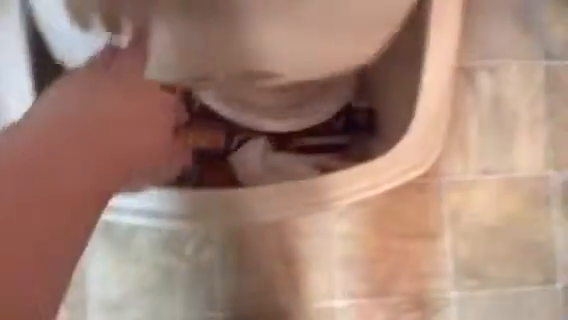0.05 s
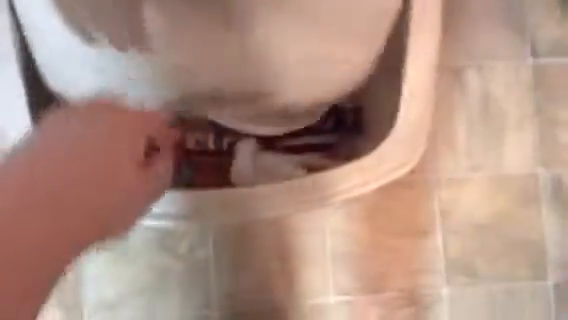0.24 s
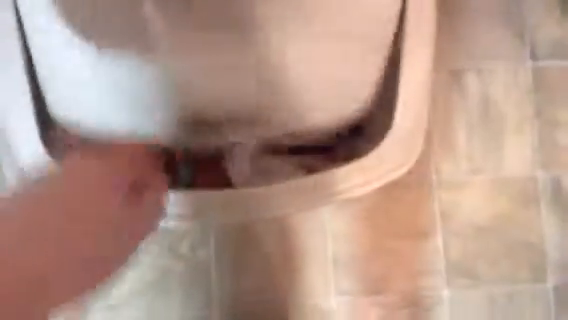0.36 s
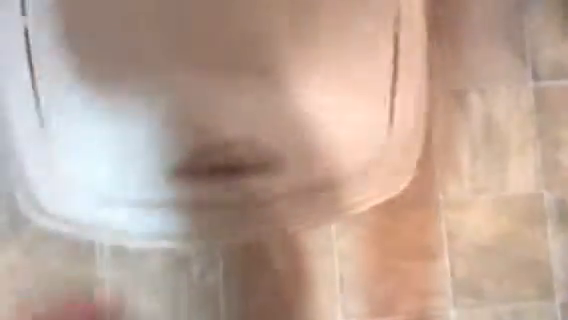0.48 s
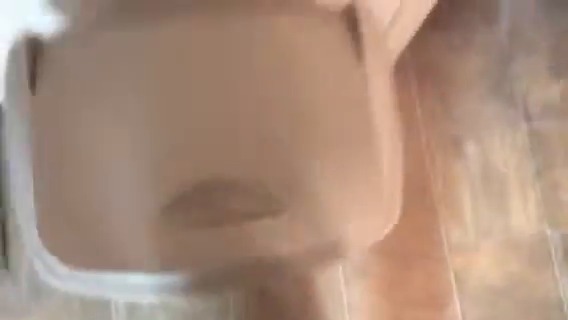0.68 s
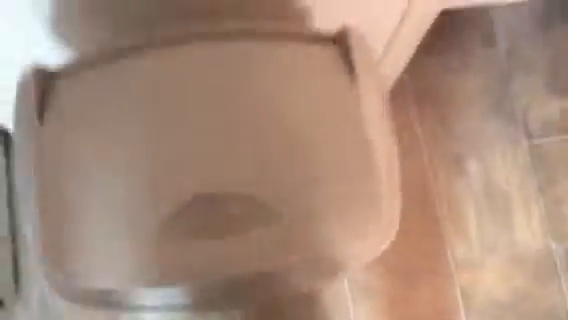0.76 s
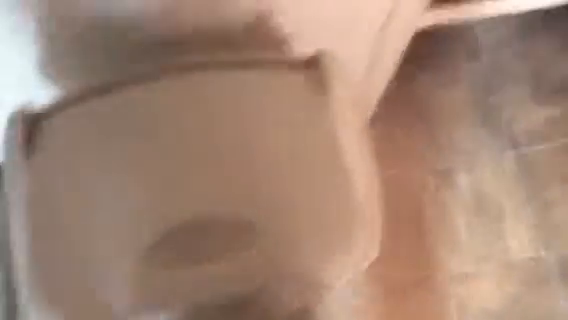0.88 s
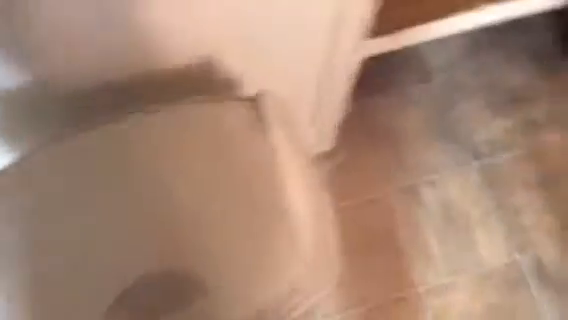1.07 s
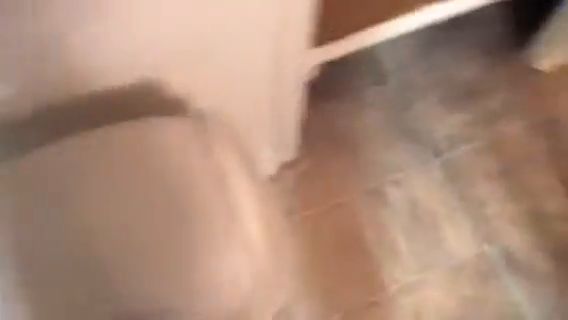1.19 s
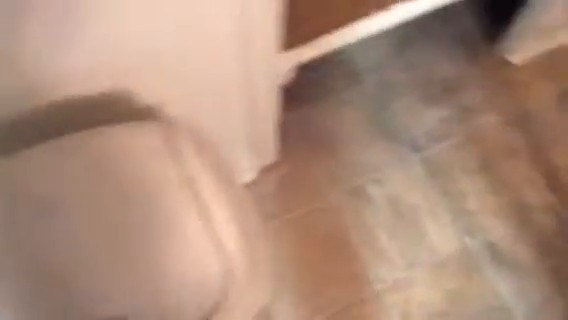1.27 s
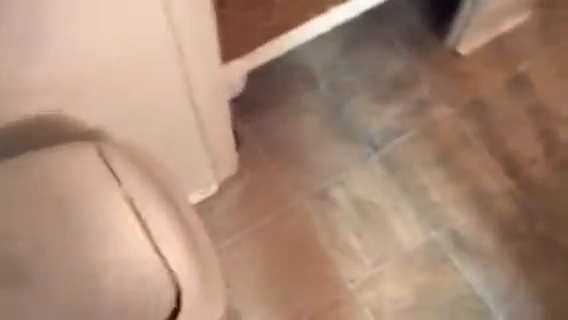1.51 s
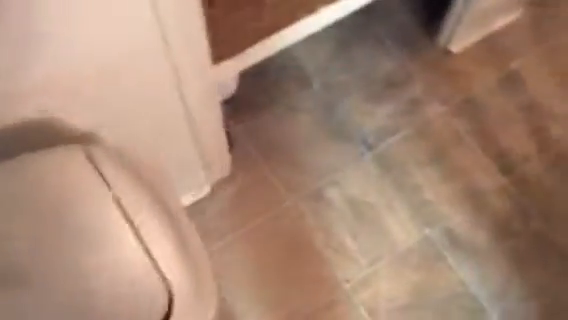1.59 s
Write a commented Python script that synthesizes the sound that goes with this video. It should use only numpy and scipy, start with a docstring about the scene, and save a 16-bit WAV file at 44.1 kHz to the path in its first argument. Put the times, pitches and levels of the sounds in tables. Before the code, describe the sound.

Close up in a small tiled room, rubbish lands in a plastic bin with a sharp, hollow thump. The liner crinkles, the lid swings shut with a quick clatter, and soft bumps and scrapes follow over a faint hum.

```python
"""A small tiled room: a hand lets go of the swing lid of a plastic bin. Rubbish thumps in, the lid
swings back and clatters on its frame, and the liner rustles and crackles. A few soft knocks, scuffs
and swishes follow, probably steps; a mains hum lies underneath. Each blow rings damped modes, with
noise bursts for rattle and crack. Friction is a stream of tiny slips with a faint ringing colour.
Blows and scrapes reflect off the tiles."""
import sys
import numpy as np
from scipy import signal
from scipy.fft import rfft, irfft, next_fast_len
from scipy.io import wavfile

SR = 44100
rng = np.random.default_rng(int(sys.argv[2]) if len(sys.argv) > 2 else 0)


def store_wav(level_fs):
    """Save 16-bit WAV to argv[1]."""
    pcm = np.round(np.clip(np.atleast_2d(level_fs), -1, 1) * 32767)
    wavfile.write(sys.argv[1], SR, pcm.T.astype(np.int16))


N = 72765
T = np.arange(N) / SR


def from_db(db):
    """Decibels to gain."""
    return 10 ** (np.asarray(db) / 20)


def unit_rms(x):
    """Scale to rms 1."""
    return x / np.sqrt(np.mean(x ** 2) + 1e-20)


def envelope(points):
    """Gain over time from (time [s], level [dB]) points."""
    return from_db(np.interp(T, *np.transpose(points)))


def burst(start_s, rise_s, t60_s):
    """Linear attack, exponential release."""
    attack = np.clip((T - start_s) / rise_s, 0, 1)
    return attack * from_db(-60 * np.clip((T - start_s - rise_s) / t60_s, 0, 2))


def click(time_s):
    """Unit impulse."""
    return 1. * (np.arange(N) == int(time_s * SR))


def at_hz(points, hz):
    """Read a table on a log-frequency axis."""
    points_hz, values = np.transpose(points)
    return np.interp(np.log(np.maximum(hz, 1)), np.log(points_hz), values)


def colour(x, spectrum, tilt_db_per_oct=0):
    """Impose a spectrum and a tilt; rms 1."""
    size = next_fast_len(N)
    hz = np.fft.rfftfreq(size, 1 / SR)
    gain_db = at_hz(spectrum, hz) + tilt_db_per_oct * np.log2(np.maximum(hz, spectrum[0][0]))
    return unit_rms(irfft(rfft(x, size) * from_db(gain_db), size)[:N])


def noise(spectrum):
    """Coloured noise; rms 1."""
    return colour(rng.standard_normal(N), spectrum)


def ring(x, hz, t60_s):
    """One mode: a unit click starts a decaying sine of height 1."""
    radius = from_db(-60 / (t60_s * SR))
    angle = 2 * np.pi * hz / SR
    return signal.lfilter([0, np.sin(angle)], [1, -2 * radius * np.cos(angle), radius ** 2], x + 1e-18)


def resonate(x, modes):
    """Drive modes of alternating polarity; rms 1."""
    ringing = sum(from_db(db) * ring(x, hz, t60_s) * (-1) ** k for k, (hz, t60_s, db) in enumerate(modes))
    return unit_rms(ringing)


def friction(slips_per_s=4800, spread_db=3, slip_share=0.87):
    """Tiny slips of uneven size over smooth noise."""
    slips = (rng.random(N) < slips_per_s / SR) * rng.choice([-1, 1], N)
    sizes = from_db(spread_db * np.minimum(rng.exponential(1, N), 4))
    smooth = rng.standard_normal(N)
    return np.sqrt(slip_share) * unit_rms(slips * sizes) + np.sqrt(1 - slip_share) * smooth


def ripple(x, depth_db=4, spacing_hz=170.5):
    """A fine random spectral ripple that gives a faint ringing colour; rms 1."""
    size = next_fast_len(N)
    grid_hz = np.arange(400) * spacing_hz
    heights = np.clip(rng.standard_normal(len(grid_hz)), -2, 2)
    gain_db = depth_db * np.interp(np.fft.rfftfreq(size, 1 / SR), grid_hz, heights)
    return unit_rms(irfft(rfft(x, size) * from_db(gain_db), size)[:N])


# mains partials: (frequency [Hz], rms level [dB])
HUM_PARTIALS = [(59.2, -56), (118.4, -60), (177.6, -66), (236.9, -64.5), (296.1, -80.5), (360.7, -75.5)]
# room tone: (frequency [Hz], relative density [dB])
ROOM_TONE_SPECTRUM = [(25, 9), (55, -8), (90, -13), (150, 3.5), (230, -2), (300, -8), (480, -10),
                      (700, -21.5), (1200, -29), (2500, -34), (6000, -40.5), (15000, -36)]
# hiss: (time [s], level [dB])
HISS_ENVELOPE = [(0, -70), (.08, -71.5), (.2, -77), (1.0, -79), (1.45, -77), (1.55, -93), (1.65, -97)]
# hiss: (frequency [Hz], relative density [dB])
HISS_SPECTRUM = [(3000, -69.5), (4500, -22), (5400, 8), (6800, -18), (8200, 6), (9400, 3), (10500, -10.5),
                 (15000, -14)]

def background(room_tone_db=-57.5):
    """Mains hum, room tone and a thin hiss."""
    hum = sum(np.sqrt(2) * from_db(db) * np.sin(2 * np.pi * (hz * T + rng.random()))
              for hz, db in HUM_PARTIALS)
    room_tone = from_db(room_tone_db) * noise(ROOM_TONE_SPECTRUM)
    hiss = envelope(HISS_ENVELOPE) * noise(HISS_SPECTRUM)
    return hum + room_tone + hiss


def tile_reverb(x, t60_s=0.51, wet_db=-18.5, delay_s=0.012, low_cut_hz=233):
    """Dense reflections off the tiles."""
    tail = rng.standard_normal(N) * burst(delay_s, delay_s, t60_s)
    tail = signal.sosfilt(signal.butter(2, low_cut_hz, "high", fs=SR, output="sos"), tail)
    return from_db(wet_db) * signal.fftconvolve(x, tail / np.linalg.norm(tail))[:N]


# film swells: (peak time [s], Gaussian sigma [s], level [dB])
SWISH_SWELLS = [(0.137, 0.027, -73), (.45, 0.11, -64.5), (0.642, 0.0087, -60.5), (1.095, 0.01, -60.5),
                (1.327, 0.025, -60.5)]
# film: (frequency [Hz], relative density [dB])
SWISH_SPECTRUM = [(3000, -21), (6000, -11.5), (8500, 4.5), (11000, -0.5), (14000, 2.5), (15500, -4)]

def swishes():
    """Thin film brushes past, swelling and fading."""
    swells = sum(from_db(db) * np.exp(-.5 * ((T - peak_s) / sigma_s) ** 2)
                 for peak_s, sigma_s, db in SWISH_SWELLS)
    return swells * ripple(colour(friction(), SWISH_SPECTRUM))


# rubbing: (time [s], level [dB])
RUB_ENVELOPE = [(0, -85), (.09, -79), (.108, -53.5), (.17, -60), (.205, -67), (.28, -59), (.35, -69),
                (.43, -66.5), (.49, -66), (.6, -67.5), (1.0, -78.5), (1.65, -83.5)]
# hollow resonances: (frequency [Hz], t60 [s], relative gain [dB])
RUB_MODES = [(817, 0.082, 2.5), (933, 0.087, -1.5), (1020, 0.092, -5)]

def hollow_rub():
    """Friction drives hollow resonances, probably the lid on its pivots."""
    return envelope(RUB_ENVELOPE) * resonate(friction(), RUB_MODES)


# liner and sleeve: (time [s], level [dB])
RUSTLE_ENVELOPE = [(0, -73), (.09, -73), (.114, -55.5), (.16, -55.5), (.203, -70.5), (.26, -49), (.33, -65),
                   (.42, -63), (.49, -61.5), (.55, -77), (.598, -69), (.642, -57), (.67, -63), (.76, -64.5),
                   (.795, -70), (.85, -63.5), (.91, -64.5), (.97, -65.5), (1.05, -73.5), (1.12, -67.5),
                   (1.26, -70), (1.332, -62), (1.36, -64), (1.42, -72), (1.54, -80), (1.65, -83)]
# liner and sleeve: (frequency [Hz], relative density [dB])
RUSTLE_SPECTRUM = [(300, 14), (900, -1.5), (1250, 1.5), (1900, 2.5), (2700, -0.5), (3800, 6), (5000, -2.5),
                   (7000, -3), (9000, 3.5), (11500, -2), (15500, -8.5)]

def rustle():
    """Liner and sleeve crinkle in tiny slips."""
    return envelope(RUSTLE_ENVELOPE) * ripple(colour(friction(), RUSTLE_SPECTRUM))


# crack, then scrapes: (time [s], rise [s], t60 [s], level [dB], tilt [dB/octave], relative ring [dB])
CRACK_AND_SCRAPES = [(0.2175, 0.00091, 0.026, -42.5, 3.5, -17), (0.814, 0.0026, .06, -47.5, -0.2, -12.5),
                     (0.863, 0.0055, 0.1, -50.5, 0, 0), (0.873, 0.0058, 0.13, -49, -2.1, -4.5),
                     (1.275, 0.0027, 0.11, -58.5, -1, -15), (1.307, 0.0039, 0.076, -59, 0.5, -20),
                     (1.368, 0.014, 0.059, -54, 2.3, -7)]
# rasp: (frequency [Hz], relative density [dB])
SCRAPE_SPECTRUM = [(400, -1), (880, -9), (1100, 0.5), (1900, 2.5), (2700, -4), (3700, 8.5), (4700, 1),
                   (5600, 4.5), (7000, 0), (9300, 4.5), (12000, -2.5), (15500, -9)]
# scraped plastic: (frequency [Hz], t60 [s], relative gain [dB])
SCRAPE_MODES = [(870, 0.15, 0), (1745, 0.034, -5), (3436, 0.029, 7), (3960, 0.027, 6.5), (5660, 0.03, -13),
                (9200, .012, -20)]

def crack_and_scrapes():
    """The sharp, bright crack of the first loud bin hit, then short scrapes and scuffs."""
    out = np.zeros(N)
    for start_s, rise_s, t60_s, db, tilt_db_per_oct, ring_db in CRACK_AND_SCRAPES:
        grains = friction()
        rasp = ripple(colour(grains, SCRAPE_SPECTRUM, tilt_db_per_oct))
        ringing = from_db(ring_db) * resonate(grains, SCRAPE_MODES)
        out += from_db(db) * burst(start_s, rise_s, t60_s) * (rasp + ringing)
    return out


# rattle decay: (frequency [Hz], base t60 [s])
RATTLE_DECAY = [(200, 0.22), (1000, 0.13), (3000, 0.078), (12000, 0.024)]
# contact crack: (frequency [Hz], relative density [dB])
CRACK_SPECTRUM = [(500, -21), (2000, -2), (3800, 2), (5000, 1.5), (7000, 2), (9500, 2), (12000, -6.5),
                  (15500, -5)]

def struck(hits, modes, rattle_spectrum):
    """Each blow rings a body's low modes, a rattle of dense upper modes and a bright crack."""
    contact_s, crack_base_t60_s = 0.00026, 0.11
    snap_db, snap_tau_s = -24.5, 0.00083   # first instant of a blow
    rattle_tail_db, crack_tail_db = -2.5, -8.5
    out = np.zeros(N)
    for k, (hz, db, t60_s) in enumerate(modes):
        force = sum(click(time_s) * from_db(ring_db) / np.hypot(1, hz / corner_hz)
                    for time_s, ring_db, corner_hz, *_ in hits)
        polarity = (-1) ** (k // 3)
        out += polarity * ring(force * from_db(db), hz, t60_s)
    remainder = noise(rattle_spectrum)
    crack_noise = ripple(noise(CRACK_SPECTRUM))
    bands = []
    for hz in 500 * 2 ** np.arange(5):   # higher octaves die sooner
        band = signal.sosfiltfilt(signal.butter(2, hz * np.sqrt(2), fs=SR, output="sos"), remainder)
        bands.append((band, at_hz(RATTLE_DECAY, hz)))
        remainder = remainder - band
    for time_s, _, _, rattle_db, crack_db, t60_scale, *_ in hits:
        snap = from_db(snap_db) * np.exp(-np.maximum(T - time_s, 0) / snap_tau_s)
        rattle = sum(band * burst(time_s, contact_s, t60_s * t60_scale) for band, t60_s in bands)
        crack = crack_noise * burst(time_s, contact_s, crack_base_t60_s * t60_scale)
        out += from_db(rattle_db) * (snap + from_db(rattle_tail_db)) * rattle
        out += from_db(crack_db) * (snap + from_db(crack_tail_db)) * crack
    return out


# bumps: (time [s], ring gain [dB], ring low-pass [Hz], rattle gain [dB], crack gain [dB],
# rattle and crack t60 scale [x], thud frequency [Hz], thud level [dB])
FLOOR_HITS = [(0.057, -20, 1210, -64, -82, 0.78, 575, -59.5), (.097, -7.5, 1030, -52, -74, 2.2, 186, -37.5),
              (0.618, -15, 280, -49, -49, 0.56, 160.3, -35.5), (0.811, -18, 320, -53, -70, 2, 174, -39.5),
              (1.0845, -8, 1500, -53, -58, 1.2, 451.6, -46.5),
              (1.1721, -5.5, 696, -48.5, -70, 1.24, 259, -44),
              (1.215, -12.5, 345, -41, -53.5, 0.55, 239, -33.5), (1.2244, 0.5, 438, -60, -81, 3, 325, -37),
              (1.338, -9.5, 297, -68, -74, 1.1, 80.5, -44),
              (1.3811, 2, 2030, -45.5, -57, 1.56, 170.8, -30.5)]
# floor: (frequency [Hz], gain [dB], t60 [s])
FLOOR_MODES = [(83.6, -44.5, 0.27), (111.7, -53, 0.24), (235, -51, 0.73), (325, -47, 0.089),
               (446.7, -50, 0.18), (525, -43.5, 0.064), (615, -47.5, 0.077), (761, -49.5, 0.06),
               (850, -47.5, 0.043), (1027, -62, .09), (1876, -61, 0.12)]
# dense floor modes: (frequency [Hz], relative density [dB])
FLOOR_RATTLE_SPECTRUM = [(150, 8), (400, 10), (900, 0), (1250, -4.5), (1950, -7), (2700, -24),
                         (4100, -14.5), (6000, -40), (15000, -18)]

def floor_knocks(thud_t60_s=0.1):
    """Soft bumps, probably steps, ring the floor, each with a hollow thud."""
    thuds = sum(from_db(db) * ring(click(time_s), hz, thud_t60_s) for time_s, *_, hz, db in FLOOR_HITS)
    return struck(FLOOR_HITS, FLOOR_MODES, FLOOR_RATTLE_SPECTRUM) + thuds


# lid blows: (time [s], ring gain [dB], ring low-pass [Hz], rattle gain [dB], crack gain [dB],
# rattle and crack t60 scale [x])
LID_HITS = [(.4975, -10, 1490, -40, -51, 0.65), (.5027, -3, 3020, -33.5, -40.5, 0.3),
            (.526, -17, 146, -43, -76, 1.1), (.5385, -7, 195, -41.5, -41, 0.84)]
# lid: (frequency [Hz], gain [dB], t60 [s])
LID_MODES = [(120.2, -23, 0.1), (164, -31, 0.14), (281, -36.5, 0.21), (325, -28.5, 0.023),
             (389, -26.5, 0.073), (546, -26, 0.046), (608, -29, 0.11), (664, -49, 0.097),
             (788, -36.5, 0.08), (832, -33, .07), (853, -36, 0.19), (1200, -51, 0.33), (1355, -50, 0.16),
             (1930, -64, 0.25), (2058, -48, 0.27), (2999, -42.5, 0.081)]
# dense lid modes: (frequency [Hz], relative density [dB])
LID_RATTLE_SPECTRUM = [(150, -16), (400, 7.5), (620, -2), (850, 4), (1100, -1.5), (2050, -4.5),
                       (2600, -8.5), (3000, -9), (4000, -7.5), (6000, -29), (15000, -33)]

def lid_clatter():
    """The lid strikes its frame four times in quick succession."""
    return struck(LID_HITS, LID_MODES, LID_RATTLE_SPECTRUM)


# bin blows: (time [s], ring gain [dB], ring low-pass [Hz], rattle gain [dB], crack gain [dB],
# rattle and crack t60 scale [x])
BIN_HITS = [(.096, -38, 1046, -84, -50, 1.8), (.2175, -28, 2470, -30, -42, 0.13),
            (.2196, 1.5, 6000, -35.5, -37.5, 1.71), (.2505, -15.5, 1500, -38.5, -28, 0.41),
            (.285, -18.5, 202, -65, -64, 0.81)]
# bin: (frequency [Hz], gain [dB], t60 [s])
BIN_MODES = [(84, -40, 0.12), (108, -32.5, 0.23), (132.4, -27.5, 0.16), (164.4, -29, 0.13),
             (196, -41, 0.36), (270.6, -31.5, 0.1), (312, -26.5, 0.066), (392, -35, 0.1),
             (598.7, -39.5, 0.11), (738, -36, .08), (748, -39.5, 0.077), (814, -41, 0.16),
             (1026, -31.5, 0.046), (1410, -41.5, 0.087), (1780, -47, 0.071), (1896, -43, 0.094),
             (1948, -37, 0.046)]
# dense bin modes: (frequency [Hz], relative density [dB])
BIN_RATTLE_SPECTRUM = [(150, -3), (330, -4), (480, -3.5), (740, 1), (1020, 1), (1220, -12), (1450, -8),
                       (1600, -7), (1930, 1.5), (2600, -8.5), (3800, -13), (6000, -44), (15000, -49)]

def bin_thumps():
    """Rubbish lands and rings the bin's plastic body."""
    return struck(BIN_HITS, BIN_MODES, BIN_RATTLE_SPECTRUM)


def scene():
    """Mono mix; only blows and scrapes feed the reverb."""
    contacts = bin_thumps() + lid_clatter() + floor_knocks() + crack_and_scrapes()
    mix = contacts + tile_reverb(contacts) + rustle() + hollow_rub() + swishes() + background()
    return mix[None]


def record(dry):
    """The microphone loses the deep bass; a steep low-pass cuts the top."""
    low_cut_hz, high_cut_hz = 48, 15450
    thin = signal.sosfilt(signal.butter(3, low_cut_hz, "high", fs=SR, output="sos"), dry)
    return signal.sosfilt(signal.ellip(12, .1, 70, high_cut_hz, fs=SR, output="sos"), thin)


dry = scene()
out = record(dry)
store_wav(out)
```